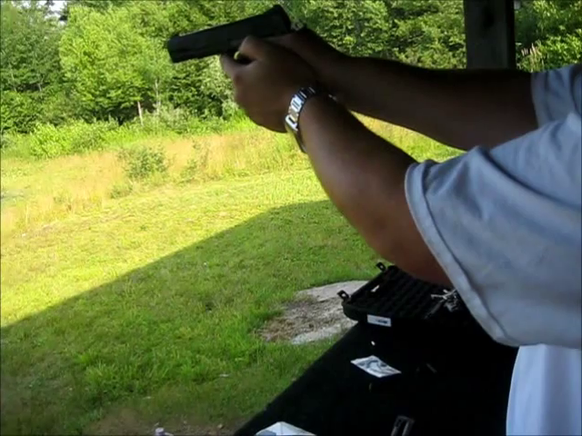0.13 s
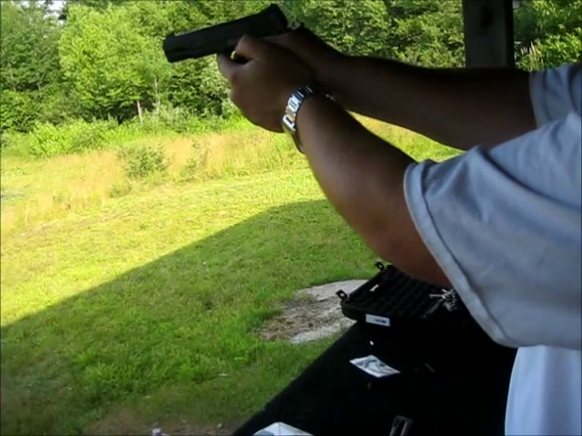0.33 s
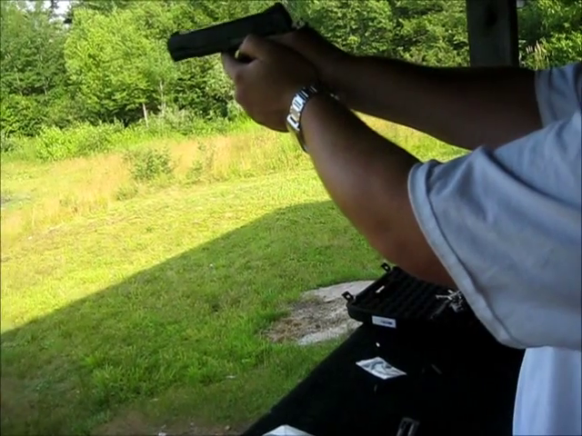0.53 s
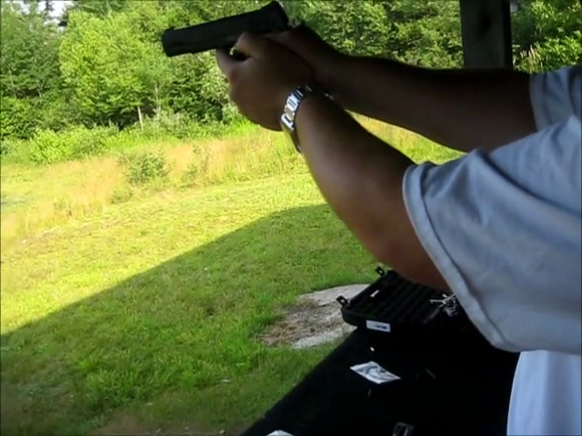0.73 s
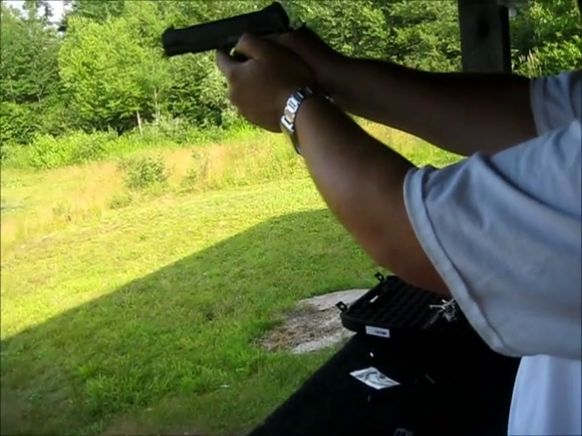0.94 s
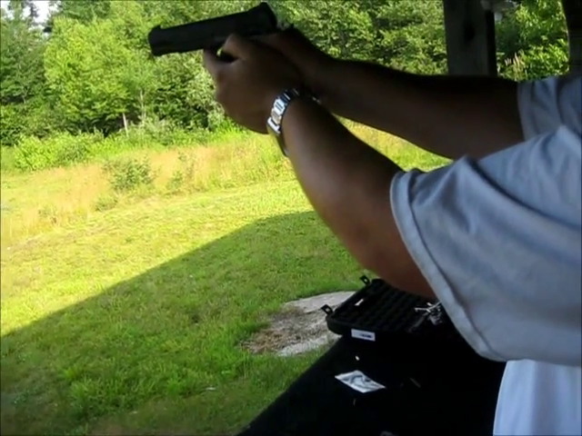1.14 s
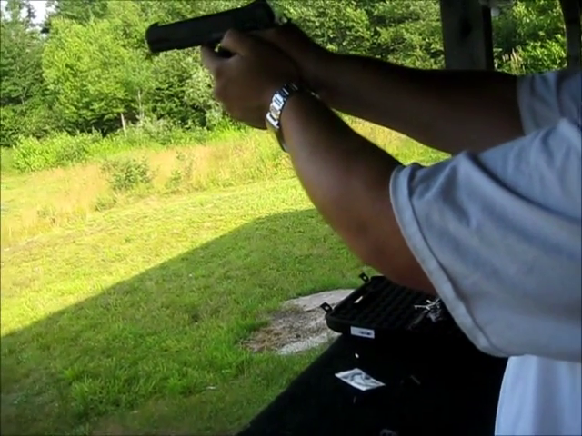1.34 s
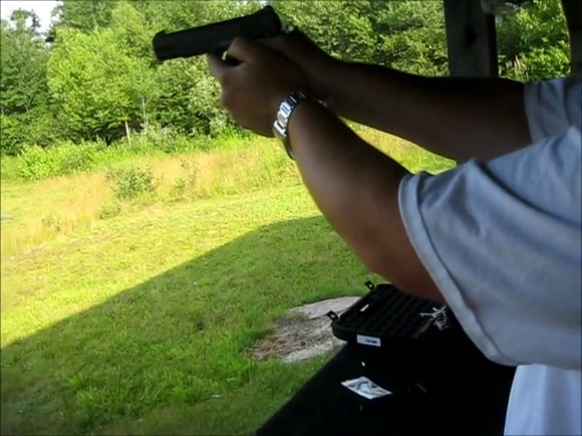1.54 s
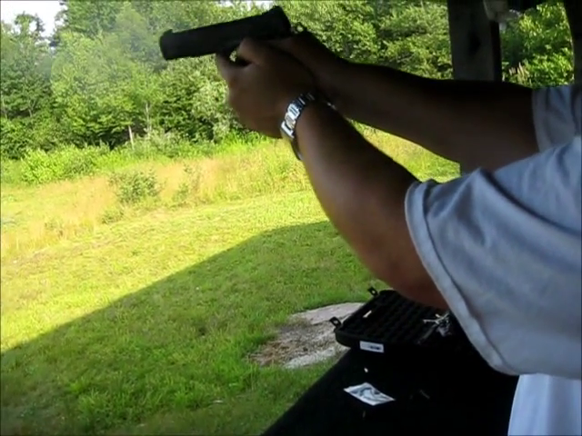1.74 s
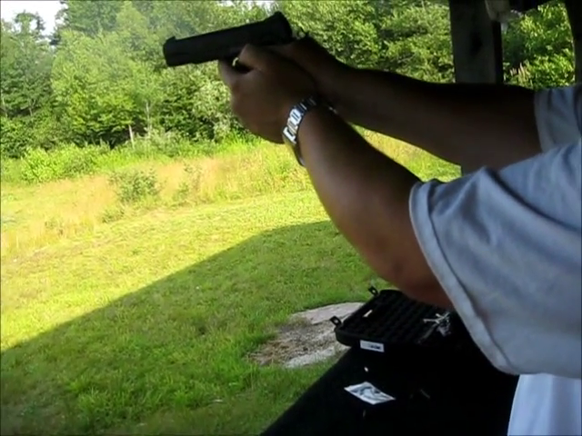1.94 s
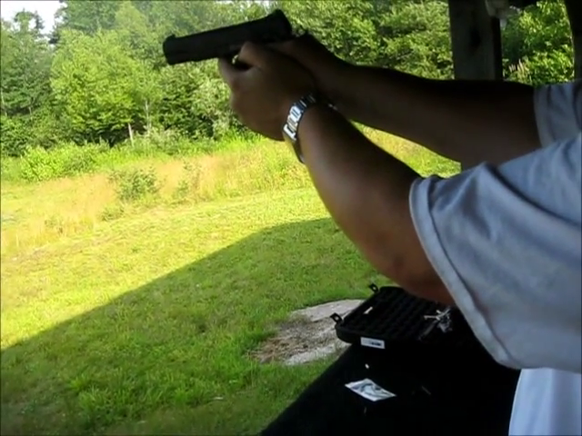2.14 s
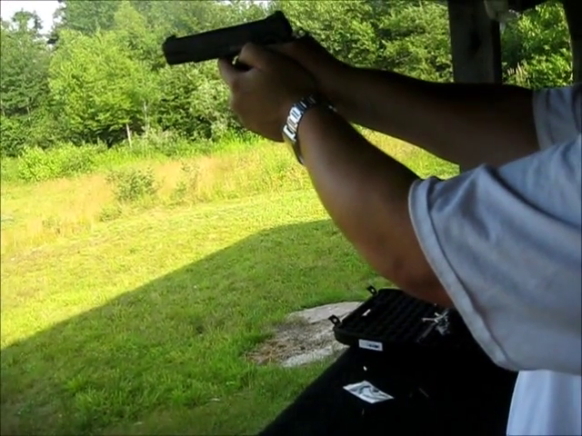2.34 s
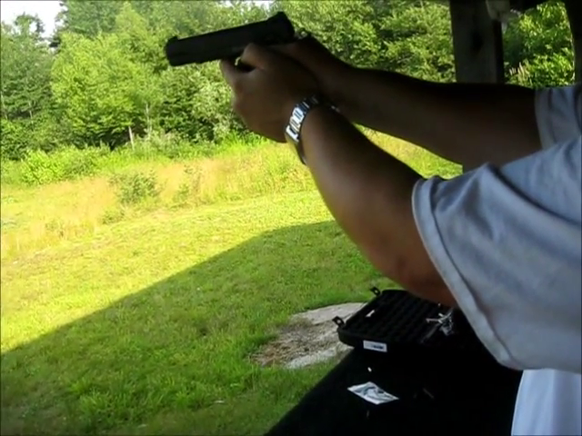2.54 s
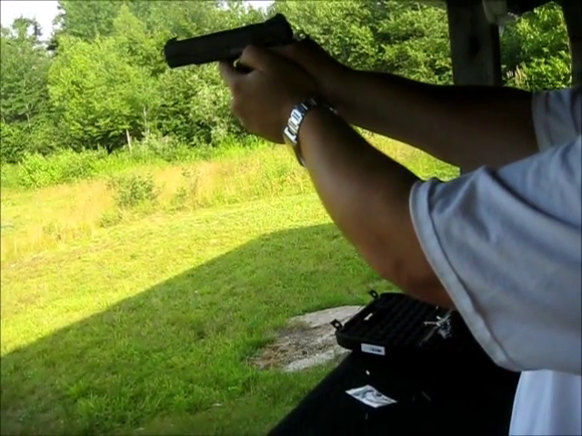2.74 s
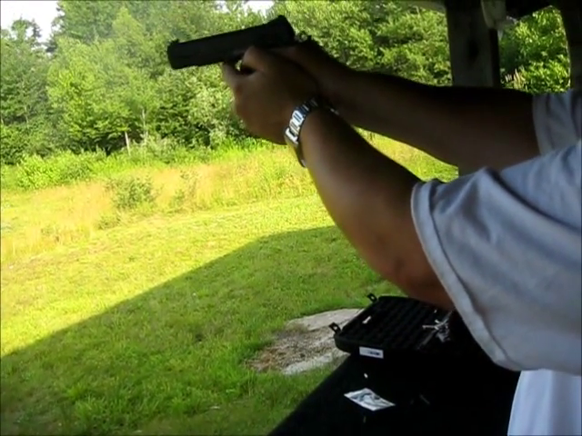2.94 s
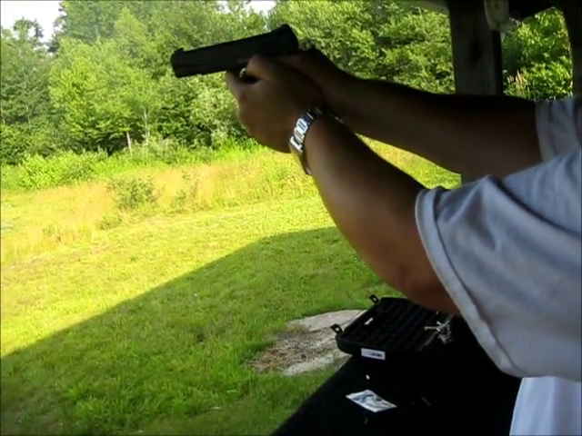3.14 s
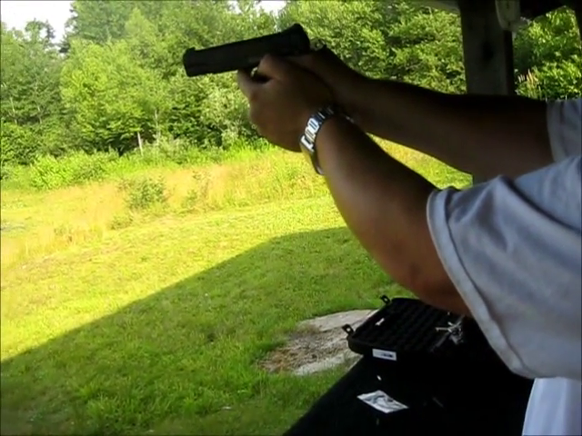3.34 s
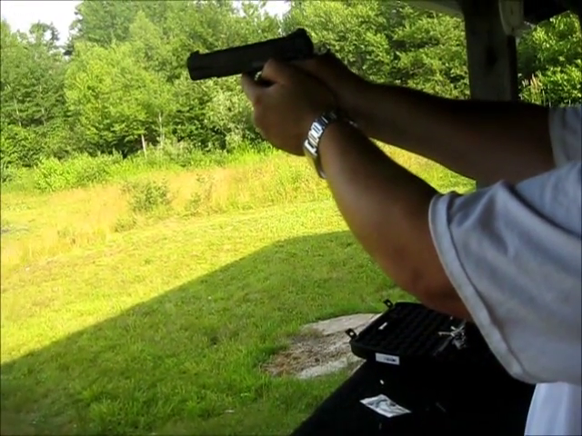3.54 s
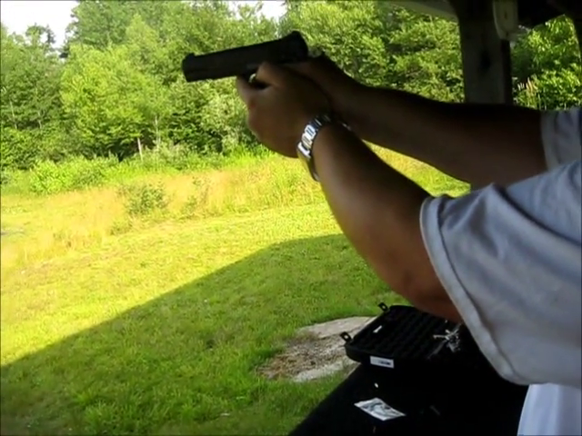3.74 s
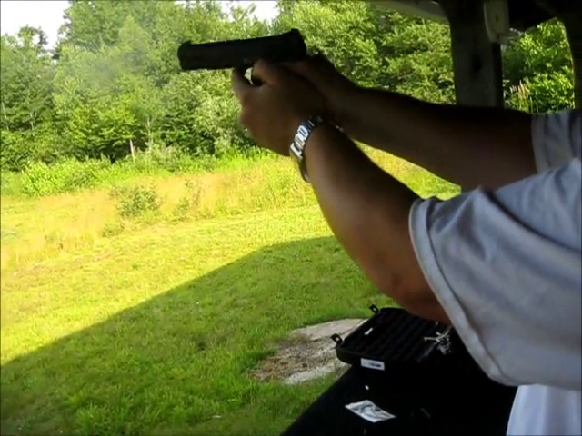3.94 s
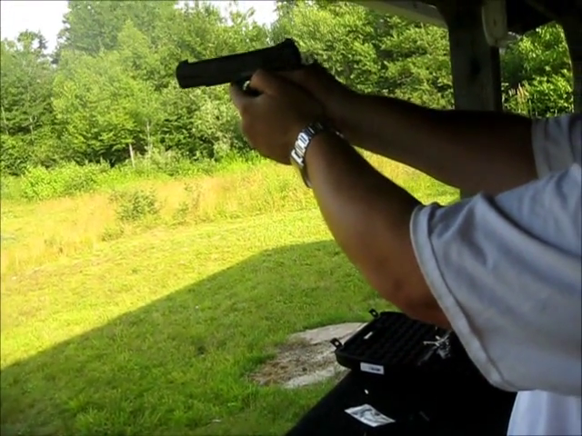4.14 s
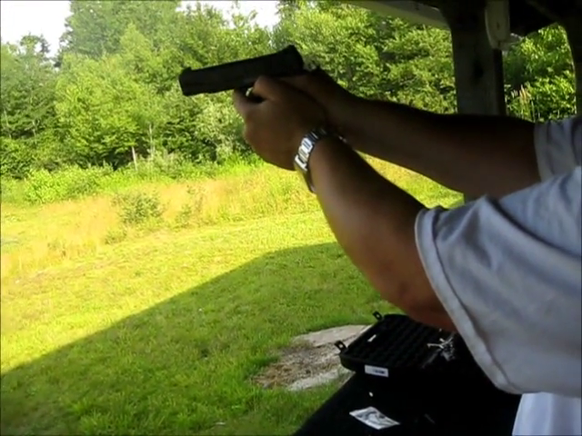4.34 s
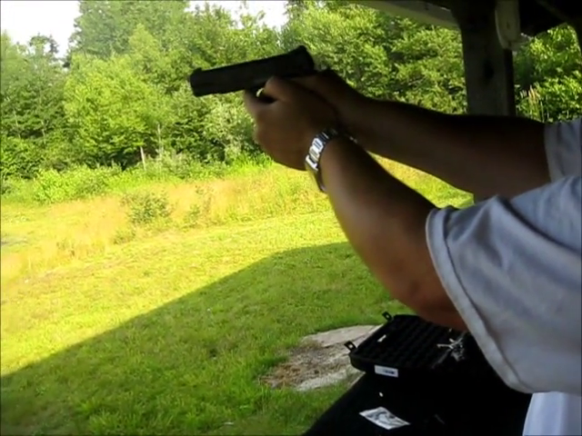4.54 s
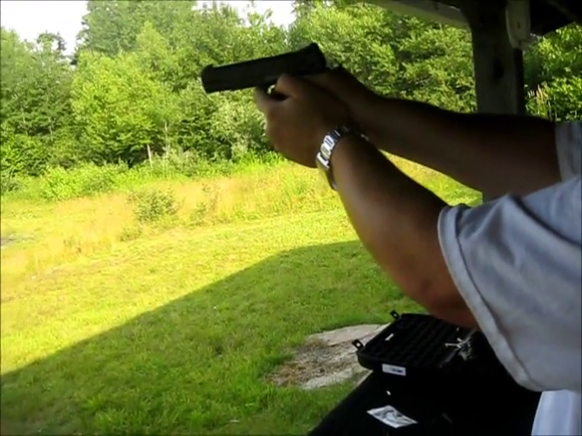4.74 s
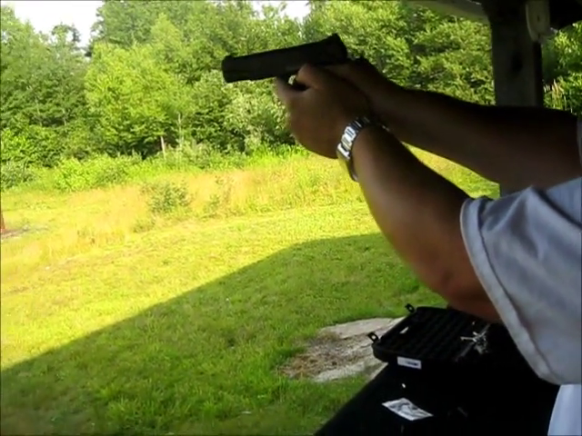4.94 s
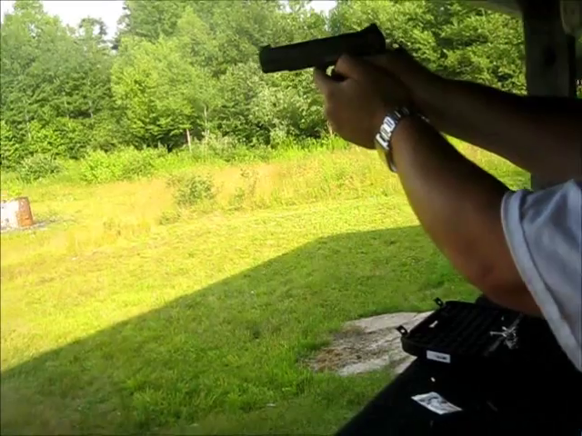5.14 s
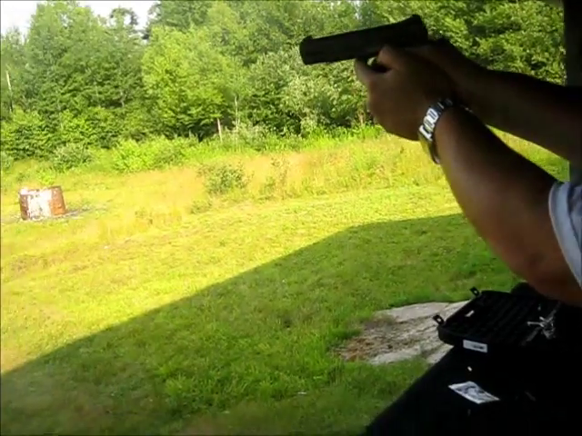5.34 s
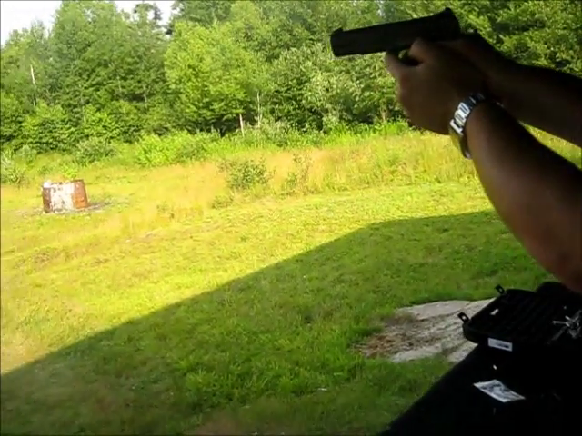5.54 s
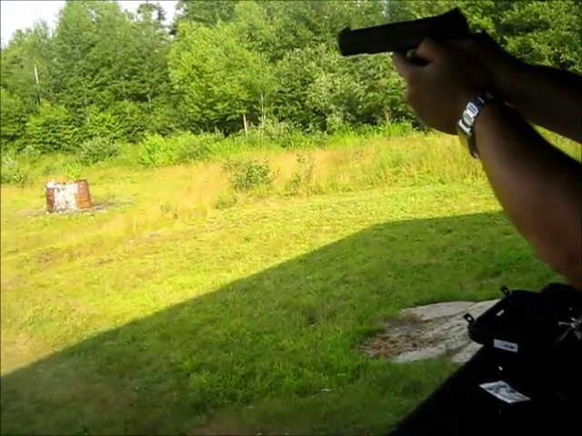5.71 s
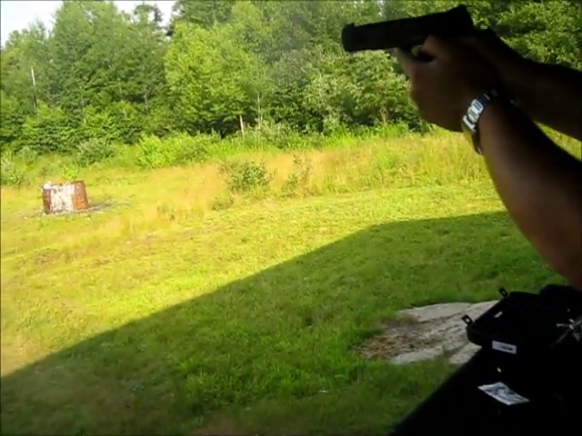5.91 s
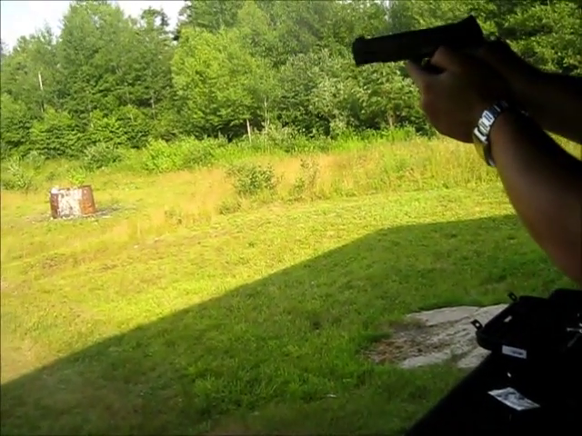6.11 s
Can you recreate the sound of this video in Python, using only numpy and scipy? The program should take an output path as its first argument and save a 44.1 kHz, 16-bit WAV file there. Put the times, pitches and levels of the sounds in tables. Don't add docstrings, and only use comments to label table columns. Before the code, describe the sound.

Five sharp pistol shots about a second apart under an open roof, each rolling back off distant trees, with brass cases tinkling on concrete.

```python
import sys
import numpy as np
from scipy import signal
from scipy.fft import rfft, irfft
from scipy.io import wavfile
from scipy.ndimage import uniform_filter1d

SR = 44100
rng = np.random.default_rng(int(sys.argv[2]) if len(sys.argv) > 2 else 0)


def volts(x):
    e = np.asarray(x, float) / 20
    return 10 ** e


def digitize_waveform(pressure):
    field = np.atleast_2d(pressure).T
    bounded = np.clip(field, -1, 1)
    quanta = np.round(bounded * 32767).astype(np.int16)
    wavfile.write(sys.argv[1], SR, quanta)


N = 276507


def evened(x):
    return x / np.sqrt(np.mean(x ** 2) + 1e-20)


def read(points, hz):
    f, value = np.transpose(points)
    return np.interp(np.log(hz + 1), np.log(f + 1), value)


def add(mix, start_s, sound):
    part = mix[round(start_s * SR):][:len(sound)]
    part += sound[:len(part)]


def coloured(x, points):
    return irfft(rfft(x) * volts(read(points, np.fft.rfftfreq(len(x), 1 / SR))), len(x))


def ringing(modes, t):
    return sum(volts(db - 60 * t / t60) * np.sin(2 * np.pi * hz * t) for hz, db, t60 in modes)


def reflectors(size, spread_db):
    size_db = spread_db * np.minimum(rng.exponential(1, size), 4)
    return evened(rng.standard_normal(size) * volts(size_db))


DUCK_DB, RECOVER_S = 24, .33


def gain_db(since_s):
    fall = np.clip(since_s / 0.0028, 0, 1)
    recovery = np.clip(1 - since_s / RECOVER_S, 0, 1)
    return -DUCK_DB * fall * recovery


SHOT_S = [
    1.6685,
    2.8029,
    3.9083,
    4.9775,
    5.8402,
]


def since_shot():
    t, fired = np.arange(N) / SR, np.array([-9] + SHOT_S)
    return t - fired[np.searchsorted(fired, t, "right") - 1]


# pitch_hz, level_db per Hz
HISS_COLOUR = [(7.1, -43), (12, -5), (65, -13.5), (244, -11.5), (394, -9.5), (549, -9.5), (678, -9.5),
               (788, -8.5), (1780, -12), (1940, -12), (5920, -15.5), (8010, -23), (9880, -21.5),
               (16000, -32.5)]
HISS_DB = -49.5
# time_s, level_db
BREEZE = [(0, -58), (.15, -57), (.4, -55), (.7, -58), (1, -70), (1.6, -66)]


def air():
    t, (s, db) = np.arange(N) / SR, np.transpose(BREEZE)
    swell = evened(uniform_filter1d(uniform_filter1d(rng.standard_normal(N), 9000), 9000))
    hiss = evened(coloured(rng.standard_normal(N), HISS_COLOUR))
    hiss = hiss * volts(HISS_DB + 0.53 * swell)
    leaves = coloured(reflectors(N, 2.0), [(200, -13), (450, -5), (800, 0), (1900, -8), (3500, -18)])
    return hiss + evened(leaves) * volts(np.interp(t, s, db))


# start_s, level_db, low_db (lower treble against it)
TICKS = [(1.635, -40, 0), (2.357, -42, -8), (2.752, -45, -12), (2.768, -47, -8), (3.860, -43, 2),
         (3.875, -41, 3), (3.889, -48, 0), (4.067, -40, -6), (4.413, -43, -10), (4.625, -47, -12),
         (4.887, -50, -5), (4.904, -49, -5), (4.923, -52, -5), (4.964, -44, 3), (5.157, -39, -15),
         (5.810, -38, 3), (5.826, -34.5, 12), (5.996, -42, -15)]
# level_db against it, t60_s
TICK_TAIL = (-1, .05)
# start_s, level_db, scatter t60_s
LANDINGS = [
    (2.128, -34, .1),
    (2.366, -37.5, 0.2),
    (2.543, -49, .1),
    (3.331, -28.5, 0.39),
    (4.430, -30.5, 0.37),
    (5.501, -26.5, 0.33),
    (5.752, -25, 0.16),
]
LANDING_LOW_DB, LANDING_TAIL_DB, TICK_TOP_DB = 3, -5, -11


def ticks(out, t):
    hits = [(*row, *TICK_TAIL) for row in TICKS]
    hits += [(s, db, LANDING_LOW_DB, LANDING_TAIL_DB, t60) for s, db, t60 in LANDINGS]
    for s, db, low_db, tail_db, t60 in hits:
        colour = [(2500, low_db - 25), (5000, low_db), (9000, 0), (13000, 0), (16000, TICK_TOP_DB)]
        tick = evened(coloured(rng.standard_normal(len(t)), colour))
        contact = volts(db - 60 * t / .015)
        scatter = volts(db + tail_db - 60 * t / t60)
        add(out, s, tick * (contact + scatter))


# pitch_hz, t60_s
MOUTHS = [(12180, .25), (12430, .23), (12440, 0.19), (12380, 0.063)]
# start_s, level_db
RINGS = [
    [(2.36, -43), (2.538, -48), (2.655, -54), (2.738, -42)],
    [(4.288, -45), (4.51, -52), (4.555, -38), (4.635, -45), (4.71, -51), (4.815, -61)],
    [(5.345, -36), (5.485, -43), (5.517, -46), (5.61, -52), (5.67, -52)],
    [(5.754, -20)],
]


def mouth_rings(out, t):
    for (mouth_hz, t60), bounces in zip(MOUTHS, RINGS):
        for s, db in bounces:
            pair = [(mouth_hz - 40, db, t60), (mouth_hz + rng.uniform(0, 60), db - 1, t60)]
            add(out, s, ringing(pair, t) * np.clip(t / 0.0049, 0, 1))


# start_s, level_db, pitch_hz, t60_s
KNOCKS = [
    (2.36, -25, 5800, .16),
    (2.537, -40, 5300, 0.12),
    (2.569, -46, 5260, .12),
    (2.652, -44, 5200, .1),
    (2.736, -38, 5560, 0.21),
    (2.758, -44, 7200, .05),
    (4.904, -52, 7400, .04),
    (5.501, -25, 6000, .033),
    (5.751, -29, 5840, .033),
]
KNOCK_SHARPNESS, SPREAD_HZ_S = 10, 28
# level_db, pitch_hz, width_hz, t60_s
CATCH = [(-31, 2330, 200, .06), (-42, 1660, 200, .05), (-36, 4000, 1500, .03), (-45, 1100, 400, .05)]
CATCH_S = 1.6345


def knocks(out, t):
    hz = np.fft.rfftfreq(len(t), 1 / SR)
    hits = [(s, db, f, f / KNOCK_SHARPNESS + SPREAD_HZ_S / t60, t60) for s, db, f, t60 in KNOCKS]
    hits += [(CATCH_S, *row) for row in CATCH]
    for s, db, body_hz, width_hz, t60 in hits:
        resonance = 1 / (1 + (2 * (hz - body_hz) / width_hz) ** 2)
        rattle = irfft(rfft(rng.standard_normal(len(t))) * resonance, len(t))
        add(out, s, evened(rattle) * volts(db - 60 * t / t60) * np.clip(t / 0.00084, 0, 1))


def cases():
    out, t = np.zeros(N), np.arange(14000) / SR
    ticks(out, t)
    mouth_rings(out, t)
    knocks(out, t)
    return out / volts(gain_db(since_shot()))


# pitch_hz, level_db, t60_s
PANEL = [(298, -21, .75), (308, -29, .55), (299, -19, .12)]
# pitch_hz, level_db
BOOM = [(60, -20), (110, -3), (220, -3), (330, -14), (500, -40)]
BOOM_DB, BOOM_T60_S = -35, .5


def roof_hum(taps, t):
    boom = evened(coloured(taps, BOOM))
    return ringing(PANEL, t) + volts(BOOM_DB - 60 * t / BOOM_T60_S) * boom


# delay_s, level_db near 1 kHz
ECHO = [(.07, -32), (.14, -31), (.26, -18.5), (.37, -18), (.46, -17.5), (.54, -19), (.62, -20),
        (.72, -22.5), (1.05, -31.5)]
# pitch_hz, level_db per Hz
TREES = [(29, -77), (50, -43), (111, -34), (175, -32), (337, -29.5), (450, -10), (615, -9), (711, -7.5),
         (973, -5), (1580, -10.5), (2160, -11.5), (5810, -23.5), (7950, -32.5), (10100, -34.5),
         (16000, -50)]
THICK_S = .4
# pitch_hz, loss_db per s of delay
ABSORB = [(150, -14), (400, 2.5), (1100, -2.5), (1700, -8), (2800, -11), (5600, -20.5), (11000, -37)]
# delay_s, extra_db
CLUMPS = [(.162, 4.5), (0.218, 5.5), (0.249, 4.5), (0.304, 5.5), (.349, 2), (0.393, 3.5), (.427, 3),
          (0.48, 3.5), (0.565, 4), (.607, 7.5), (0.675, 3), (.69, 2), (.752, 1.5), (.927, 2)]
CLUMP_S = 0.0075
# pitch_hz, share
CLUMP_SHARE = [(500, 0.77), (900, 1.45), (1500, 0.23), (3000, 0.39)]
# pitch_hz, extra_db
HEDGE = [(1200, -0.5), (3000, 1.5), (6000, 2), (11000, 4.5)]
HEDGE_S, HEDGE_DEPTH_S = .285, .05
# pitch_hz, width_hz, lift_db
GROUND = (975, 420, 7)
GRAZE_S = .44
EDGE_S, EDGE_BLUR_S = .675, .035
BEYOND_S = 0.26


def tree_echo(taps):
    hz, t, z = signal.stft(taps, SR, nperseg=512, noverlap=448)
    lift_hz, lift_width_hz, full_lift_db = GROUND
    lift_db = full_lift_db * np.exp(-(2 * (hz - lift_hz) / lift_width_hz) ** 2)
    colour = volts(read(TREES, hz) + lift_db)
    near_1khz = (hz > 600) & (hz < 1400)
    colour = colour / np.sqrt(np.sum(colour[near_1khz] ** 2) / len(hz))
    beyond = .5 + .5 * np.tanh((t - EDGE_S) / EDGE_BLUR_S)
    path_s = t - THICK_S + BEYOND_S * beyond
    clumps_db = sum(db * np.exp(-((t - delay) / CLUMP_S) ** 2) for delay, db in CLUMPS)
    hedge = np.exp(-((t - HEDGE_S) / HEDGE_DEPTH_S) ** 2)
    shape_db = np.outer(read(ABSORB, hz), path_s)
    shape_db = shape_db + np.outer(read(CLUMP_SHARE, hz), clumps_db)
    shape_db = shape_db + np.outer(read(HEDGE, hz), hedge)
    shape_db = shape_db - np.outer(lift_db, np.clip(1 - t / GRAZE_S, 0, 1))
    z = z * colour[:, None] * volts(shape_db)
    echo = signal.istft(z, SR, nperseg=512, noverlap=448)[1][:len(taps)]
    t = np.arange(len(taps)) / SR
    return echo * volts(np.interp(t, *np.transpose(ECHO))) * np.clip(t / 0.077, 0, 1)


# pitch_hz, level_db per Hz
BLAST = [(120, -3), (200, -14), (986, 0), (1620, -4), (1770, -2.5), (2020, -8), (3620, -4), (6880, -14.5),
         (7970, -17), (9930, -14.5), (16000, -22.5)]
# pitch_hz, t60_s
STAND_T60 = [(200, 0.22), (1000, 0.15), (3000, 0.16), (6000, 0.15), (12000, 0.15)]


def blast(taps):
    hz, t, z = signal.stft(coloured(taps, BLAST), SR, nperseg=128)
    rise_s = read([(1000, .009), (4000, .006), (9000, .001)], hz)[:, None]
    rise = np.clip((t + .001) / rise_s, 0, 1) ** 1.3
    decay = volts(-60 * t / read(STAND_T60, hz)[:, None])
    decay = decay * (1 + 1.3 * np.exp(-(t / 0.0083) ** 4))
    body = signal.istft(z * rise * decay, SR, nperseg=128)[1]
    body = signal.sosfilt(signal.butter(3, 330, "high", fs=SR, output="sos"), body)
    return body / np.sqrt(np.mean(body[:800] ** 2))


LEAD_DB = -31


def hammer(lead_s):
    clatter = coloured(rng.standard_normal(512), [(500, -11), (2000, -4), (12000, -6)])
    return volts(LEAD_DB) * evened(clatter)[:round(lead_s * SR)]


# level_db, length_s, lead_s (hammer ahead of the blast)
SHOTS = [
    (-46, .004, .0075),
    (-16, 0.00089, 0.0073),
    (-11, .0045, 0.0081),
    (-1.5, 0.0006, .007),
    (-46, .003, 0.0064),
]


def shots():
    out, t = np.zeros(N), np.arange(56000) / SR
    trees, stand = reflectors(len(t), 2.14), reflectors(8192, 0.66)
    roof = roof_hum(trees, t)
    for s, (thump_db, thump_s, lead_s) in zip(SHOT_S, SHOTS):
        heard = tree_echo(evened(trees + .5 * reflectors(len(t), 1.9)))
        add(heard, 0, volts(-5.5) * blast(stand + 0.66 * reflectors(8192, 4.1)))
        u = t / thump_s
        heard += volts(thump_db) * (1 - u / 2) * u * np.exp(-u)
        add(out, s, heard / volts(gain_db(t)) + roof)
        add(out, s - lead_s, hammer(lead_s))
    return out


def scene():
    return (shots() + cases() + air())[None]


def roll_off(x):
    return signal.sosfilt(signal.butter(12, 16440, fs=SR, output="sos"), x)


def record(dry):
    x = np.clip(dry[0] * volts(gain_db(since_shot())), -.95, .95)
    x = coloured(x, [(25, -6), (150, 0), (6800, 0), (7600, -5.5), (7850, -24), (7950, -24), (8050, -12),
                     (8300, -5.0), (9000, -2), (15750, 1.5), (16050, -30), (16500, -50)])
    return roll_off(np.clip(x, -1, 1)[None])


dry = scene()
out = record(dry)
digitize_waveform(out)
```